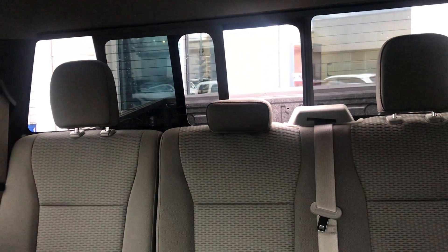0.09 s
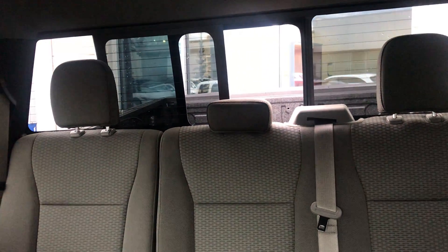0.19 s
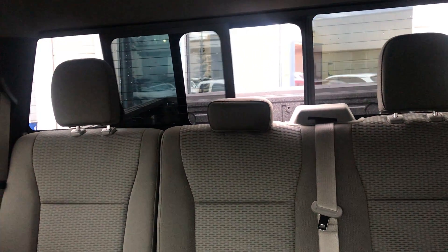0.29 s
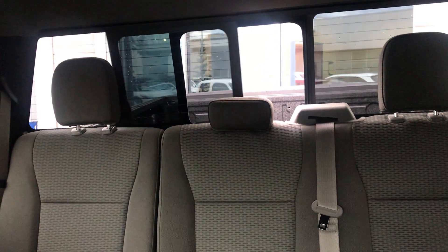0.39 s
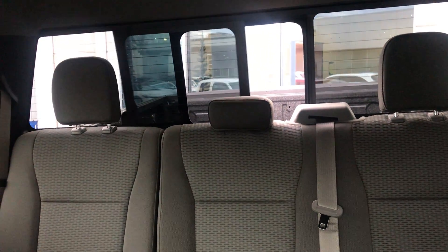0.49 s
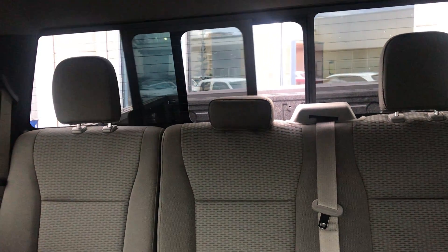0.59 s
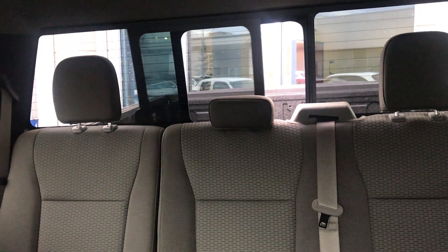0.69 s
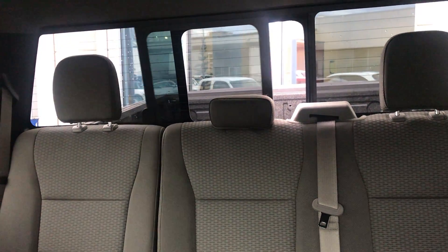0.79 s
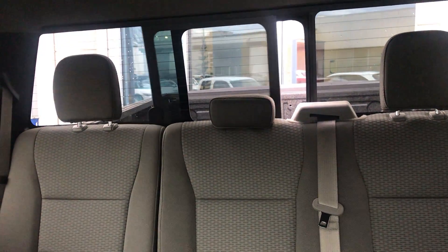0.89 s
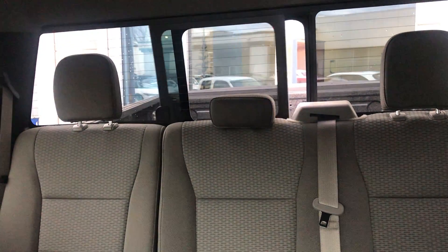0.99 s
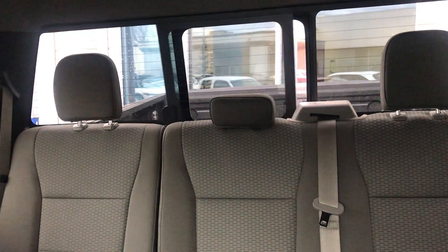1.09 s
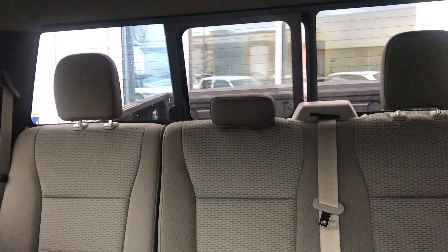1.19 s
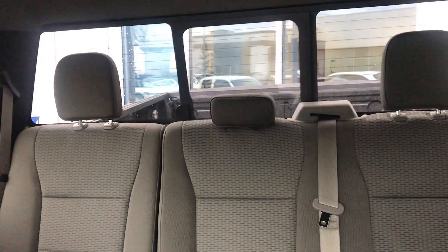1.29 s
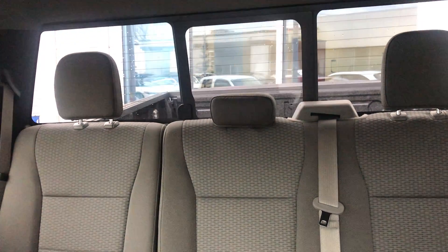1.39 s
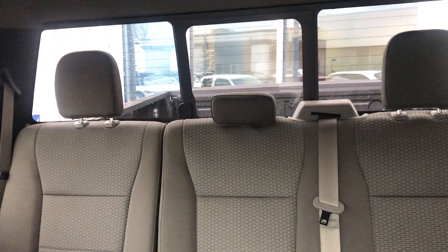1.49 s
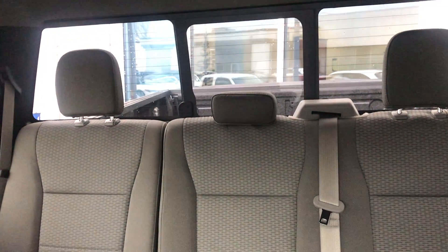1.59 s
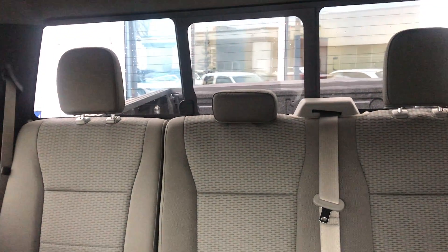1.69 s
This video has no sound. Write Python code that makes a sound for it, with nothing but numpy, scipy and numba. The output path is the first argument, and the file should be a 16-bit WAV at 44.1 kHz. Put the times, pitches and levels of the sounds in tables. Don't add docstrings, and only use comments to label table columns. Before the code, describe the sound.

Inside a quiet truck cabin, a motorized rear window takes up slack with a few knocks, hums low while the glass hisses along felt, then cracks and thuds against its stop; close single microphone.

```python
import sys
import numpy as np
from scipy import signal
from scipy.fft import rfft, irfft
from scipy.io import wavfile
from scipy.ndimage import uniform_filter1d
from numba import njit

SR = 44100
rng = np.random.default_rng(int(sys.argv[2]) if len(sys.argv) > 2 else 0)


def invert_db(level):
    return 10 ** (np.asarray(level, dtype=float) / 20)


def unload_audio(sound):
    columns = np.transpose(np.atleast_2d(sound))
    steps = np.round(np.clip(columns, -1, 1) * 32767)
    wavfile.write(sys.argv[1], SR, steps.astype(np.int16))


N = 77175
T = np.arange(N) / SR

START_S, STOP_S, RISE_S = 0.287, 1.392, 0.006
SPIN_UP_S = 0.028
RUMBLE_DB = -49.5
# f/Hz, level/dB per Hz
RUMBLE = [(50, -5), (70, 15), (110, -4), (170, 7.5), (230, -4.5), (400, -10.5), (700, -23), (16000, -100)]


def noise():
    return rng.standard_normal(N)


def unit(x):
    return x / np.sqrt(np.mean(x ** 2))


@njit
def svf(x, hz, width):
    y, band_state, low_state = np.empty(len(x)), 0., 0.
    for i in range(len(x)):
        g, k = np.tan(np.pi * hz[i] / SR), width / hz[i]
        v = (band_state + g * (x[i] - low_state)) / (1 + g * (g + k))
        band_state = 2 * v - band_state
        low_state = low_state + 2 * g * v
        y[i] = k * v
    return y


def band(x, hz, width):
    return svf(x, np.full(N, 1. * hz), 1. * width)


def walk(rate):
    hold = int(SR / rate)
    steps = np.repeat(rng.standard_normal(N // hold + 1), hold)
    return 0.95 * uniform_filter1d(uniform_filter1d(steps, hold), hold)[:N]


def colour(x, table):
    hz, db = np.array(table).T
    f = np.maximum(np.arange(N // 2 + 1) * SR / N, 1)
    gain_db = np.interp(np.log(f), np.log(hz), db) - 30 * np.maximum(np.log2(hz[0] / f), 0)
    return unit(irfft(rfft(x) * invert_db(gain_db), N))


def fade(start, t60):
    rise_s = 0.0007
    u = np.maximum(T - start, 0)
    return (1 - np.exp(-u / rise_s)) * invert_db(-60 * u / t60)


def ring(modes, start, push):
    u = np.maximum(T - start, 0)
    swing = 0
    for k, (hz, db, t60) in enumerate(modes):
        swing = swing + (-1) ** k * invert_db(db - 60 * u / t60) * np.sin(2 * np.pi * hz * u)
    return (1 - np.exp(-u / push)) * swing


def cabin():
    air_db, early_hiss_db = -53, -69
    # f/Hz, level/dB per Hz
    air_shape = [(15, -68), (25, -14), (48, -5.5), (107, -3.5), (380, -19), (447, -25), (975, -30),
                 (1580, -41), (15600, -52.5)]
    # f/Hz, level/dB per Hz
    early_hiss_shape = [(600, -13), (1200, 1), (3000, -6), (5000, -7.5), (8000, -40)]
    air = invert_db(air_db + 0.5 * walk(7.91)) * colour(noise(), air_shape)
    early_hiss = invert_db(early_hiss_db + 2 * walk(45)) * colour(noise(), early_hiss_shape + [(16000, -47)])
    return air + early_hiss * (T < START_S + 0.02)


def strain():
    start_s, below_running_db = 0.198, -3
    gate = np.clip((T - start_s) / RISE_S, 0, 1) * (T < START_S + SPIN_UP_S)
    return invert_db(RUMBLE_DB + below_running_db) * gate * colour(noise(), RUMBLE)


def crack(hz):
    width = 0.85 * hz
    grit = noise() * invert_db(2 * walk(500))
    return unit(band(band(grit, hz, width), hz, 1.28 * width))


def knocks():
    lag_s, push_s = 0.003, 0.003
    # t/s, crack level/dB, crack centre f/Hz, crack t60/s, thump level/dB
    hits = [(0.201, -61, 930, 0.045, -46), (0.211, -49, 1040, 0.04, -49), (0.22, -62, 700, 0.033, -35),
            (0.2522, -50.5, 2870, 0.029, -46), (0.2861, -44.5, 2630, 0.091, -29),
            (.296, -43, 905, 0.04, -31), (0.313, -49, 3400, .08, -28.5), (.371, -41, 660, 0.032, -36.5),
            (.397, -41, 710, 0.015, -46.5), (1.432, -46.5, 1900, 0.054, -38),
            (1.4319, -60, 5500, 0.01, -50), (1.455, -62, 600, .04, -38.5), (1.475, -55.5, 600, 0.025, -42)]
    # f/Hz, level/dB, t60/s
    wall = [(95, -8, 0.3), (169.5, 7, 0.058), (220, -10, 0.044), (355, -2.5, 0.0325), (600, -13, 0.0256)]
    out = 0
    for s, db, hz, t60, thump_db in hits:
        out = out + invert_db(db) * fade(s, t60) * crack(hz)
        out = out + invert_db(thump_db) * ring(wall, s + lag_s, push_s)
    return out


def running():
    fall_s = 0.024
    return np.clip((T - START_S) / RISE_S, 0, 1) * invert_db(-20 * np.maximum(T - STOP_S, 0) / fall_s)


def motor():
    near_octave_db, wobble_db, phase_wander = -18, 0.35, 0.18
    fizz_db = -64.5
    # t/s, f/Hz, hum level/dB, octave level/dB, level/dB of the low tone at 0.37 f
    gears = [(0.336, 93, -48, -45.5, -42), (0.391, 102.3, -42, -50.5, -44.5), (.44, 95, -64, -66, -58),
             (0.491, 87.26, -46, -58, -53), (0.529, 87.6, -44.5, -46, -71), (.6, 86.8, -46.5, -57, -57),
             (.645, 91.8, -52, -80, -94), (0.678, 96.8, -47.5, -45.5, -61), (.77, 101.3, -49, -52, -54),
             (.85, 101.7, -46.5, -57, -77), (.94, 97.9, -54, -58, -68), (0.999, 104.4, -44.5, -58.5, -49),
             (1.07, 107.6, -41.5, -59.5, -61), (1.2, 108.2, -49, -55.5, -74),
             (1.29, 104.3, -40, -58.5, -74), (1.38, 107.7, -46, -48.5, -67)]
    # f/Hz, level/dB per Hz
    brush_shape = [(7000, -6), (8500, -1), (10500, -5), (12500, 0), (14000, -2), (15800, -6)]
    s, hz, db, octave_db, low_tone_db = np.array(gears).T
    phase = 2 * np.pi * np.cumsum(np.interp(T, s, hz)) / SR
    hum_db, octave_db, low_tone_db = (np.interp(T, s, v) for v in (db, octave_db, low_tone_db))
    orders = ((1, hum_db), (2, octave_db), (0.37, low_tone_db), (1.9, hum_db + near_octave_db))
    hum = 0
    for k, level_db in orders:
        uneven = max(k, 1)
        level = invert_db(level_db + wobble_db * uneven * walk(29.74))
        hum = hum + level * np.sin(k * (phase + phase_wander * uneven * walk(18)))
    rumble = invert_db(RUMBLE_DB + 2 * walk(20)) * colour(noise(), RUMBLE)
    fizz = invert_db(fizz_db + 0.47 * walk(35) + 2.4 * walk(500)) * colour(noise(), brush_shape)
    return np.clip((T - START_S) / SPIN_UP_S, 0, 1) * (np.sqrt(2) * hum + rumble) + fizz


def felt_grit():
    return noise() * invert_db(2 * walk(600))


def slide():
    pane_db, flicker_db, climb_width_hz = -2, 0.5, 250
    # t/s, level/dB
    speed = [(.335, -56), (.45, -55.5), (.55, -55.5), (.66, -55.5), (.72, -53), (.85, -55), (.93, -53.5),
             (1.0, -55), (1.1, -55), (1.23, -54.5), (1.3, -52.5), (1.38, -52.5)]
    # f/Hz, level/dB per Hz
    track_shape = [(190, -24), (330, 2.5), (706, -0.5), (775, -5), (874, -1), (2080, -2.5), (3230, -1),
                   (8000, -18), (10400, -43), (17600, -120)]
    # f/Hz, width/Hz, level/dB
    pane_modes = [(1530, 710, -2.5), (3070, 1200, -2), (4130, 900, -0.5), (5200, 460, -11)]
    # start t/s, end t/s, from f/Hz, to f/Hz, level/dB
    climbs = [
        (0.47, 0.632, 1190, 1400, -67.5),
        (0.662, 1.0, 3260, 3140, -61),
        (.72, 0.856, 4120, 4350, -64),
        (0.84, 1.222, 2049, 2617, -59.5),
        (1.173, 1.363, 1441, 1720, -59.5),
        (1.3, 1.396, 2700, 3060, -62),
    ]
    rub = felt_grit()
    pane = 0
    for hz, width, db in pane_modes:
        pane = pane + invert_db(db + 2 * walk(30)) * unit(band(rub, hz, width))
    hiss = colour(felt_grit(), track_shape + [(16000, -45)]) * invert_db(flicker_db * walk(44.9))
    hiss = hiss + invert_db(pane_db) * unit(pane)
    s, db = np.array(speed).T
    out = hiss * invert_db(np.interp(T, s, db))
    for begin, end, from_hz, to_hz, db in climbs:
        u = np.clip((T - begin) / (end - begin), 0, 1)
        hz = from_hz + (to_hz - from_hz) * u
        tone = svf(svf(felt_grit(), hz, 1. * climb_width_hz), hz, 2. * climb_width_hz)
        swell = np.sqrt(np.sin(np.pi * u) + 1e-12)
        out = out + invert_db(db + 3.2 * walk(40.2)) * swell * unit(tone)
    return out


def seal():
    # centre t/s, spread/s, f/Hz, level/dB
    swishes = [
        (1.348, 0.0059, 8800, -50.5),
        (1.347, 0.0064, 3300, -51.5),
        (1.366, 0.0092, 2270, -61),
        (1.384, 0.0087, 2100, -66),
    ]
    out = 0
    for s, spread, hz, db in swishes:
        swell = np.exp(-((T - s) / spread) ** 2 / 2)
        out = out + invert_db(db + 2.5 * walk(460)) * swell * unit(band(noise(), hz, 0.5 * hz))
    return out


def stop():
    frame_db, snap_db, snap_t60_s = -35, -31.5, 0.028
    thud_s, thud_push_s, thud_db = 1.4065, 0.0048, -19
    # t/s, ring level/dB, snap level/dB
    bounces = [
        (1.3902, -7, 3.5),
        (1.3943, 8, -1.5),
        (1.398, 3, -30),
        (1.404, -11.5, -17),
    ]
    # f/Hz, level/dB, t60/s
    frame = [(278.7, 8, 0.033), (492, -8.5, 0.096), (551.6, -3, 0.13), (605, -23, 0.084), (712, -15, 0.058),
             (942, -17, 0.026), (1234, -13, 0.019), (1462, -8, 0.025), (1632, -4, 0.03), (1910, -18.5, 0.1),
             (2250, -9, 0.029), (2730, -4, 0.019)]
    # f/Hz, level/dB per Hz
    snap_shape = [(600, 1.5), (1500, 17), (2700, 3.5), (5000, 2.5), (9000, -6.5), (15800, -20)]
    # f/Hz, level/dB, t60/s
    thud_modes = [(98.8, -1, 0.14), (191.6, -4, 0.076), (225, -2, 0.065), (303, -17, 0.071),
                  (151.4, -25.5, 0.36)]
    edge = 0
    for k, (s, ring_db, bounce_snap_db) in enumerate(bounces):
        edge = edge + (-1) ** k * invert_db(frame_db + ring_db) * ring(frame, s, 0.00035)
        edge = edge + invert_db(snap_db + bounce_snap_db) * fade(s, snap_t60_s) * colour(noise(), snap_shape)
    first_push = invert_db(-19) * ring(thud_modes, STOP_S, thud_push_s)
    return edge - invert_db(thud_db) * (ring(thud_modes, thud_s, thud_push_s) + first_push)


def room(x):
    t60_s, tail_db, hz = 0.17, -21, 2200
    tail = band(noise(), hz, 2 * hz) * fade(0.0014, t60_s)
    return x + invert_db(tail_db) * signal.fftconvolve(x, tail / np.sqrt(np.sum(tail ** 2)))[:N]


def scene():
    travel = running() * (motor() + slide())
    contacts = room(knocks() + seal() + stop())
    return (cabin() + strain() + travel + contacts)[None]


def top_cut(x):
    return signal.sosfilt(signal.butter(12, 15790, fs=SR, output="sos"), x)


def record(dry):
    ceiling = 0.12
    return top_cut(ceiling * np.tanh(dry / ceiling))


dry = scene()
out = record(dry)
unload_audio(out)
```